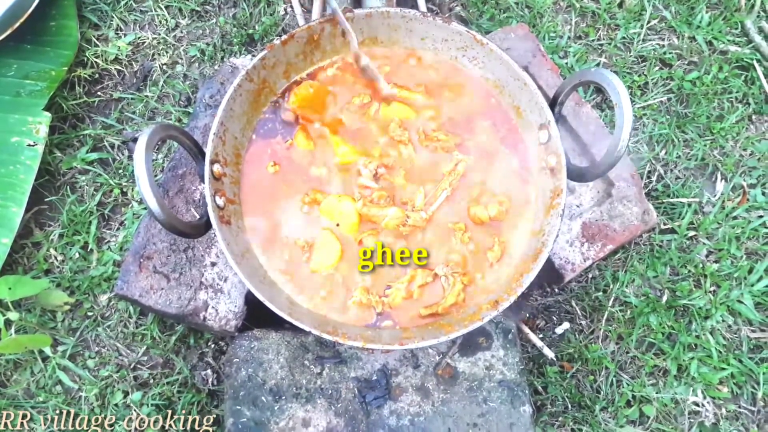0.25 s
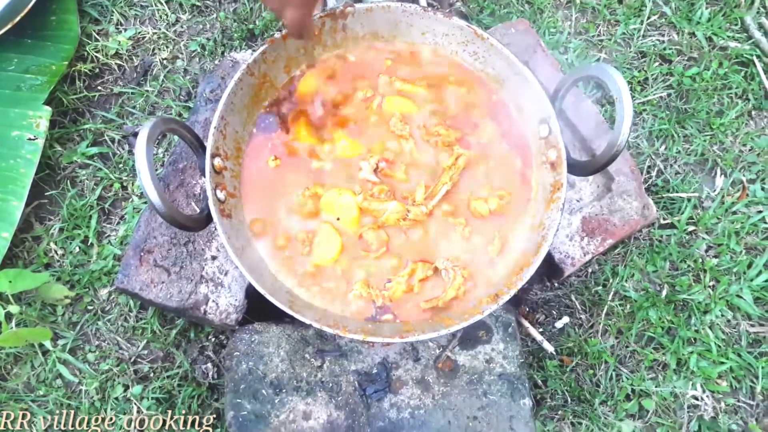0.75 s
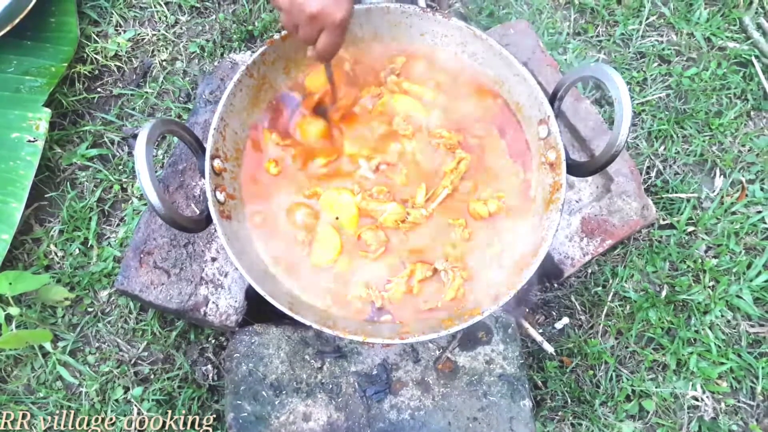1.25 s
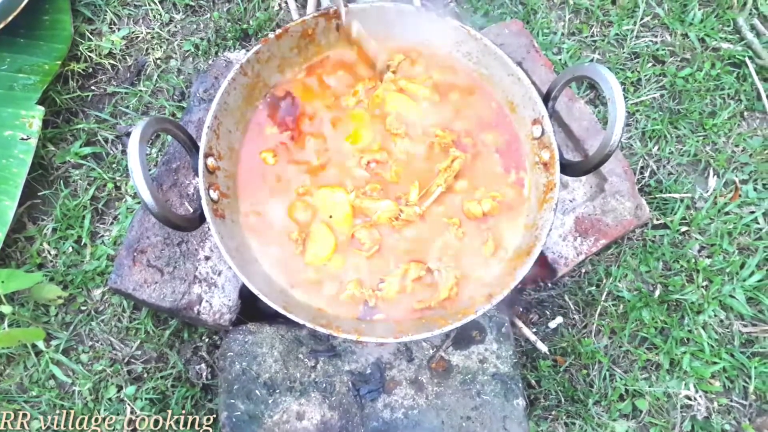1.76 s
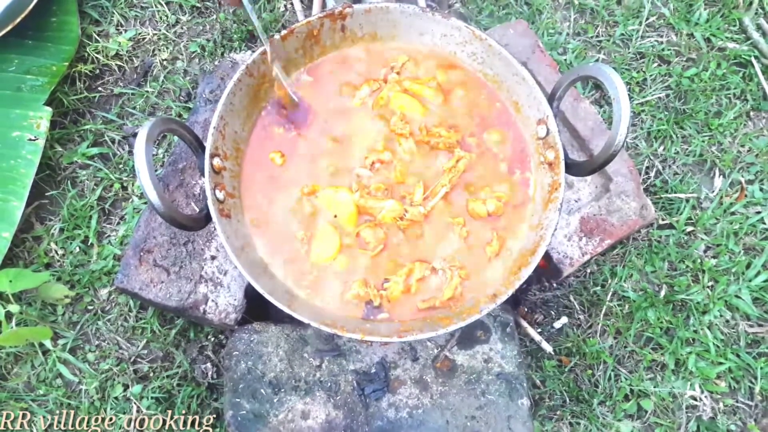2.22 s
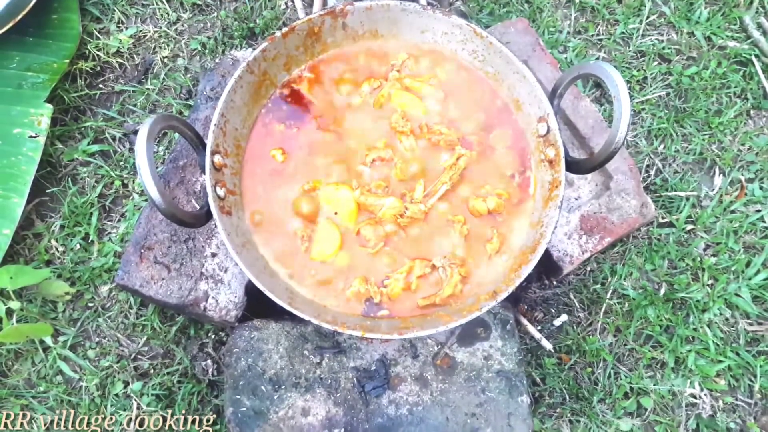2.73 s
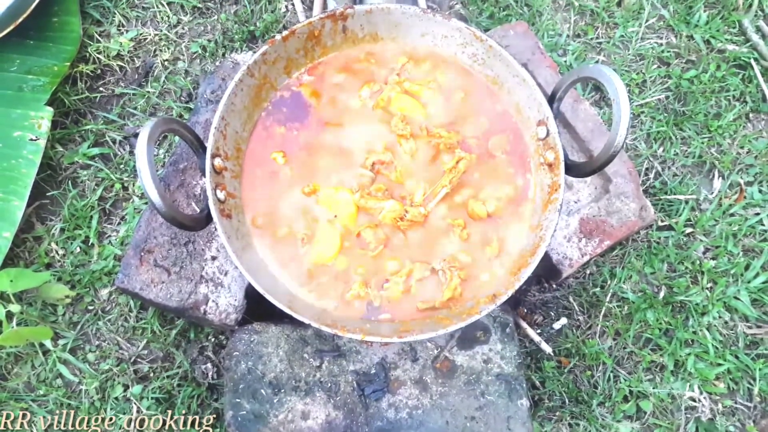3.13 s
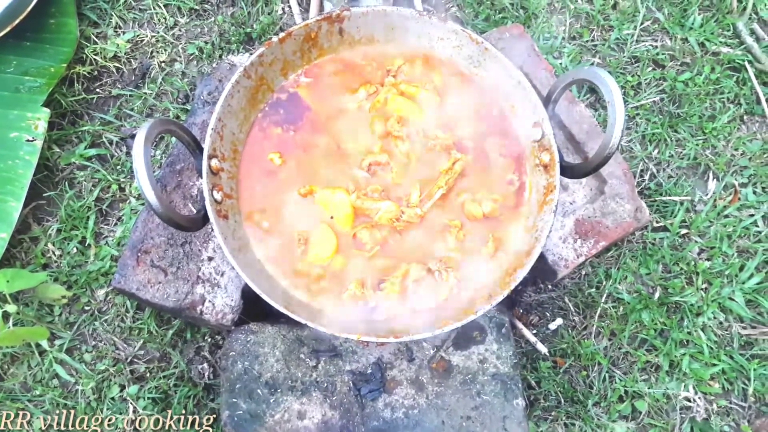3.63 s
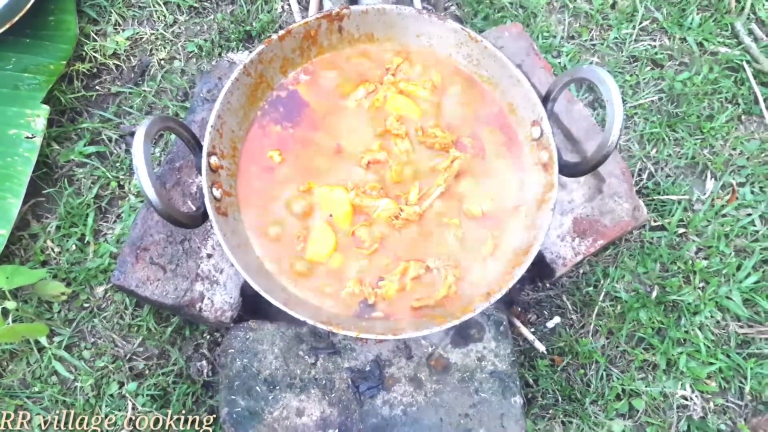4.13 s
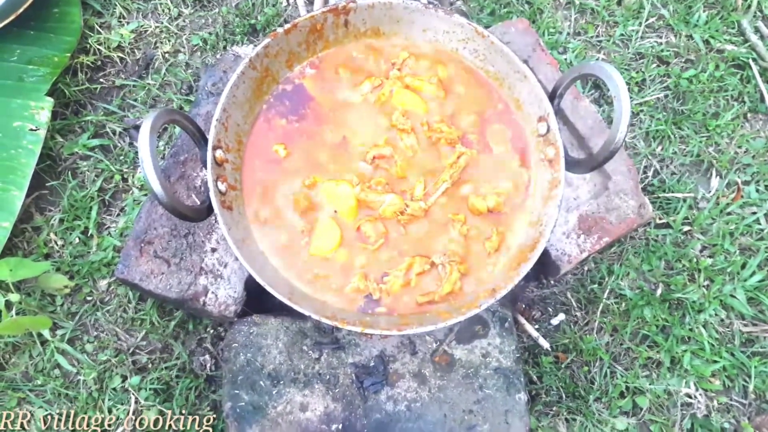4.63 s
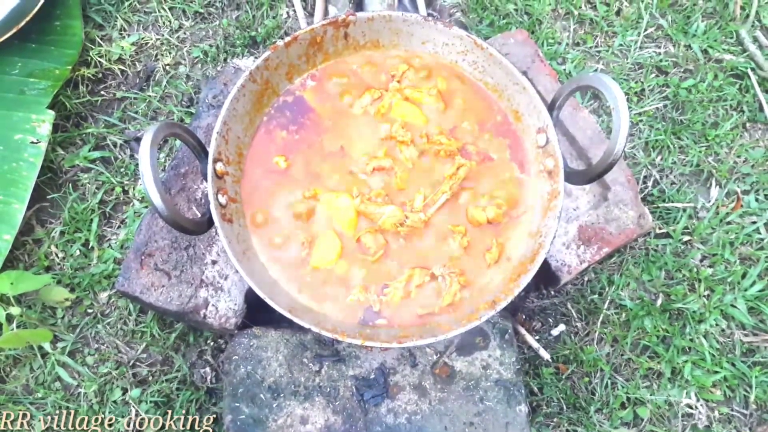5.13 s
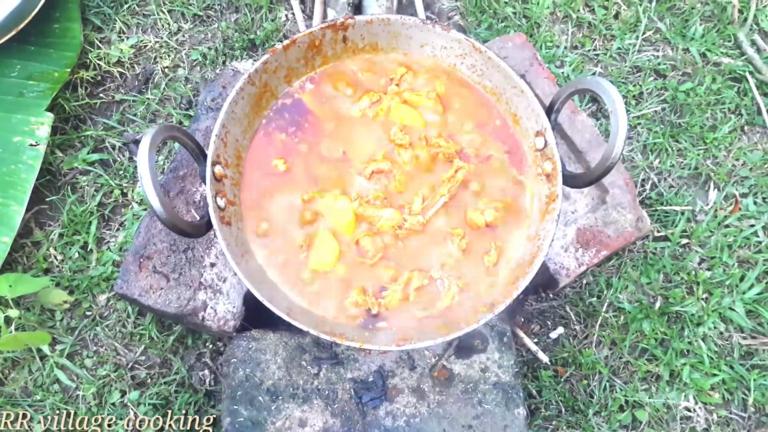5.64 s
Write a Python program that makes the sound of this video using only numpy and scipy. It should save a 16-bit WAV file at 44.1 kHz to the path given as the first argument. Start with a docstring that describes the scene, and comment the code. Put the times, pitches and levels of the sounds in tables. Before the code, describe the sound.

Thick curry bubbles and spits steadily in a metal pan over an outdoor fire, with sharp spoon knocks, insects and brief bird notes.

```python
"""In a garden, an open fire under a metal pan of thick simmering curry, heard by one microphone in open air.
Bubbles are damped tones of climbing pitch, spits filtered clicks, fire and steam coloured noise.
Insects (noise resonances and a pulse stack), a far engine and near and far birds surround the pan.
A spoon knocks on the pan's ringing modes, then jingles and squeals as it is laid down.
Gain control sinks around the loud knocks and slides back; a limiter holds their peaks."""
import sys
import numpy as np
from scipy import signal
from scipy.fft import rfft, irfft
from scipy.io import wavfile
from scipy.ndimage import uniform_filter1d, minimum_filter1d

SR = 44100
rng = np.random.default_rng(int(sys.argv[2]) if len(sys.argv) > 2 else 0)


def gain_from_db(level_db):
    """Convert decibel levels to linear amplitude factors (20 dB per decade)."""
    decades = np.asarray(level_db, float) / 20
    return 10 ** decades


def put_to_file(sound):
    """Save the sound as 16-bit audio at rate SR, in the file named by the first command-line argument."""
    columns = np.atleast_2d(sound).T  # one column per channel
    safe = np.clip(columns, -1, 1)
    whole_steps = np.round(safe * 32767)
    wavfile.write(sys.argv[1], SR, whole_steps.astype(np.int16))


N = 258891

# fire and steam wash, relative spectrum: [f/Hz, density/dB per Hz]
WASH_SPECTRUM = [(20, -33.5), (35, -22.5), (60, -6), (137, -0.5), (200, -3), (354, -15), (607, -10),
                 (900, -21), (1650, -20.5), (2700, -20), (3920, -20.5), (6560, -30), (8830, -17),
                 (11000, -17), (12500, -43), (15000, -42)]
# level of the steam wash over time, followed in part by the small bubbles: [t/s, level/dB]
STEAM_LEVEL = [(0, 1.5), (1, 1.5), (2, 1), (2.6, 1.5), (3.0, -4), (3.75, -5.5), (4.05, -2), (5, -1.5),
               (5.87, -1)]
# insect chorus resonances: [f/Hz, width before blurring/Hz, relative level/dB]
INSECT_CHORUS = [(5700, 202, -14.5), (7670, 180, -10), (8080, 33, -9.5), (8620, 89, -1.5), (9090, 49, -3),
                 (9400, 88, -6), (9980, 44, -7), (10760, 190, -7)]
# nearer insect: [multiple of pulse rate, level/dB]
CICADA = [(24, -62.5), (25, -66.5), (26, -66.5), (27, -60), (28, -62.5), (30, -63), (31, -62)]
# far engine: [multiple of firing rate, level/dB]
ENGINE = [(2, -77), (3, -68), (4, -57.5), (5, -52.5), (6, -61.5), (10, -72.5)]
# far engine: [t/s, firing rate/Hz]
ENGINE_SPEED = [(0, 30), (.7, 31), (2.5, 31.3), (4.2, 31), (5.87, 30.4)]
# loudest bubbles bursting: [t/s, level/dB, starting f/Hz, length/cycles]
BUBBLES = [(0.0308, -24, 3840, 7.8), (0.0371, -28, 4070, 9), (0.1003, -25.5, 4500, 9),
           (0.129, -32, 1310, 4), (0.2188, -32, 1360, 8.4), (0.2228, -21.5, 3630, 8.6),
           (0.2965, -28.5, 1600, 6.2), (0.3129, -22.5, 736, 3.7), (0.3756, -28.5, 4260, 9.8),
           (0.595, -24, 3710, 8), (0.6425, -30.5, 570, 3.8), (0.7672, -25, 3670, 7.2),
           (0.8206, -27, 570, 3.2), (0.847, -26, 3840, 9), (0.8546, -31, 1290, 7.0),
           (0.8796, -29.5, 1070, 11), (0.9954, -31.5, 670, 4.9), (1.041, -23.5, 3720, 9.6),
           (1.0911, -25, 3970, 9), (1.1389, -28, 624, 7.6), (1.1414, -24, 4610, 8.3),
           (1.1704, -24, 5760, 9), (1.312, -28.5, 3370, 9), (1.3421, -35, 2030, 13), (1.49, -34, 1920, 7),
           (1.7058, -34, 2310, 16), (1.5142, -21, 5640, 9), (1.5414, -24, 3360, 7.6),
           (1.6766, -27, 4060, 9), (1.7226, -20, 3750, 6.3), (1.79, -25.5, 930, 5.6),
           (1.7912, -26, 1850, 6), (1.7986, -23, 1220, 9.6), (1.815, -31, 1540, 8), (1.861, -25, 4400, 9),
           (2.0101, -26.5, 3500, 10), (2.0109, -32, 685, 3.5), (2.1879, -23, 1010, 6),
           (2.199, -27, 1900, 9), (2.232, -26, 565, 4.6), (2.2672, -24.5, 4120, 8), (2.3018, -27, 3610, 9),
           (2.8322, -30.5, 663, 5.5), (2.9645, -34, 1840, 34), (3.0608, -31.5, 630, 4.4),
           (3.1571, -32, 865, 7.7), (3.2075, -23, 4550, 9), (3.292, -24.5, 2390, 9.9),
           (3.3033, -17, 3990, 7.3), (3.3291, -34.5, 1500, 16), (3.4304, -24, 1215, 2.3),
           (3.662, -35.5, 1280, 19), (3.6828, -31, 1000, 4.9), (3.6858, -32, 2360, 11),
           (3.755, -32, 3540, 12), (4.012, -32, 1870, 6.5), (4.2962, -33, 945, 12), (4.2975, -34, 1900, 11),
           (4.3288, -30.5, 4000, 8.4), (4.481, -36, 960, 11.5), (4.9593, -28, 4210, 9),
           (5.0743, -35, 914, 14), (5.327, -34, 530, 8.4), (5.4196, -23.5, 610, 5.9), (5.56, -32, 716, 4.7),
           (5.8154, -26, 580, 2.7)]
# loudest droplets spitting on hot metal: [t/s, click level before the band filter/dB]
SPITS = [(0.0272, -24), (0.203, -24), (1.2963, -27), (1.6986, -24), (2.2052, -19), (3.3062, -23),
         (4.538, -24), (4.551, -25), (5.143, -10), (5.3078, -16), (5.4401, -24), (5.4904, -20),
         (5.6762, -23)]
# near bird notes: [t/s, length/s, first f/Hz, last f/Hz, level before throb/dB, throb depth 0-1]
NEAR_BIRD = [(1.811, 0.053, 2590, 2444, -42.5, 0.97), (1.966, 0.018, 2470, 2390, -39, 1),
             (2.092, 0.052, 2600, 2316, -34, .2), (2.14, .035, 2280, 2140, -43, 0.23),
             (2.142, .102, 2487, 2222, -39.5, 0.2), (2.287, 0.032, 1916, 2000, -42.5, 0.15),
             (2.314, 0.033, 1850, 1780, -44, 0)]
# far crow: [t/s, length/s, first fundamental f/Hz, last fundamental f/Hz, level/dB, tilt/dB per partial]
FAR_BIRD = [(1.06, .165, 660, 665, -56.5, -12), (1.22, .065, 668, 682, -62, -12),
            (3.99, .32, 655, 652, -65.5, 0)]
# far crow's sounding partials: [multiple of the fundamental, relative level/dB]
FAR_PARTIALS = [(3, 1), (4, 0), (5, -14)]
# spoon on pan: [t/s, level/dB, crack t60/s, ring and scatter relative level/dB, bass cut f/Hz]
KNOCKS = [(1.3745, -16, 0.0061, -29, 250), (2.388, -11.5, 0.0085, -39, 3000), (2.4247, 6, 0.02, -32.5, 70),
          (2.438, -30, 0.034, -27, 2000), (2.5858, 7, 0.022, -32, 130), (4.992, -19, 0.0054, -29, 410)]
# pan modes: [f/Hz, relative level before uneven striking/dB, t60/s]
PAN_MODES = [(137, 12, 0.013), (1458, -10.5, 0.092), (1926, -6.5, 0.092), (2560, -11, 0.098),
             (3000, -8.5, 0.12), (3740, 2.5, .06), (4160, -12, 0.17), (5740, -16, 0.11), (7300, -1, 0.097),
             (11300, -17, .06)]
# knock's crack, relative spectrum: [f/Hz, density/dB per Hz]
CRACK_SPECTRUM = [(60, -36), (130, -19), (400, -18.5), (2370, -18), (3320, -13), (4470, 0), (5530, -3.5),
                  (7450, -12), (8280, -17), (8830, -12), (11200, -6.5), (12700, -30.5), (14700, -19),
                  (16500, -9)]
# spoon modes: [f/Hz, width/Hz, relative rattle level/dB, relative squeal level/dB]
SPOON_MODES = [(1820, 120, -8.5, -19.5), (3750, 100, -11, -39), (4333, 34, -10, 1.5), (5040, 90, -16, -17),
               (6240, 130, -7, -31), (7620, 65, -25, -0.5), (8300, 54, -25, -7.5), (8700, 150, -1.5, -25),
               (9640, 180, -10, -30), (10470, 78, -6, -35), (11150, 81, -8, -31), (11400, 78, -6.5, -30),
               (14400, 80, -17, -20), (15300, 80, -21, -30)]
# touches of the spoon laid down, each a dying rattle: [t/s, level/dB, t60/s]
TOUCHES = [(4.768, -26.5, 0.077), (4.785, -39, 0.34), (4.839, -39, 0.21), (4.858, -43.5, 0.23),
           (4.885, -43, 0.084)]
# spoon slides: [t/s, length/s, first level/dB, last level/dB, extra level of upper modes/dB]
SLIDES = [(4.839, .028, -31, -23, -8), (4.868, .013, -25, -30, 6), (4.893, .03, -46, -47, 9)]


def rms_one(x):
    """Scale to unit rms."""
    return x / np.sqrt(np.mean(x ** 2) + 1e-20)


def in_time(rows):
    """Columns of a timed curve, interpolated sample by sample."""
    s, *columns = np.transpose(rows)
    return [np.interp(np.arange(N) / SR, s, column) for column in columns]


def drift(rate_hz):
    """Random wander of unit rms: noise through two equal low-pass poles at rate_hz."""
    r = np.exp(-80 * np.pi * rate_hz / SR)   # computed on every 40th sample
    noise = rng.standard_normal(N // 40 + 2002)
    slow = signal.lfilter([1], [1, -2 * r, r * r], noise)[2000:]
    return np.interp(np.arange(N) / 40, np.arange(len(slow)), rms_one(slow))


def resonance(x, hz, width_hz):
    """Two-pole peak with gain 1 on top."""
    r = np.exp(-np.pi * width_hz / SR)
    feedback = [1, -2 * r * np.cos(2 * np.pi * hz / SR), r * r]
    return signal.lfilter([(1 - r * r) / 2, 0, (r * r - 1) / 2], feedback, x + 1e-18)


def shaped(x, spectrum):
    """Causal colouring by a short minimum-phase filter, built through the cepstrum."""
    table_hz, table_db = np.transpose(spectrum)
    hz = np.maximum(np.fft.rfftfreq(4096, 1 / SR), 10)
    log_gain = np.interp(np.log(hz), np.log(table_hz), table_db) * np.log(10) / 20
    cepstrum = irfft(np.maximum(log_gain, -9))
    # fold onto positive time
    cepstrum[1:2048] *= 2
    cepstrum[2049:] = 0
    impulse = irfft(np.exp(rfft(cepstrum)))
    return signal.fftconvolve(x, impulse)[:len(x)]


def add(out, s, sound):
    """Lay a short sound in at time s."""
    i = int(s * SR)
    out[i:i + len(sound)] += sound[:N - i]


def stack(hz, partials, waver, flicker_db, rate_hz):
    """Multiples of one slightly unsteady repeat rate, each flickering on its own."""
    phase = 2 * np.pi * np.cumsum(hz * (1 + waver * drift(rate_hz))) / SR
    return sum(gain_from_db(db + flicker_db * drift(rate_hz)) * np.sin(k * phase + k * k) for k, db in partials)


def fire():
    """Low flame rumble; above it a steam wash that follows a level curve."""
    noise = rms_one(shaped(rng.standard_normal(N), WASH_SPECTRUM))
    wash = gain_from_db(-51.5 + 0.5 * drift(2.3)) * noise
    rumble = signal.lfilter(*signal.butter(1, 250, fs=SR), wash)
    steam = wash - rumble
    return rumble + gain_from_db(in_time(STEAM_LEVEL)[0]) * steam


def insects():
    """A far chorus blurs into noise in a few resonances; one nearer singer keeps its steady pulse rate."""
    white = rng.standard_normal((2, N))
    chorus = 0
    for k, (hz, width_hz, db) in enumerate(INSECT_CHORUS):
        band = resonance(white[k % 2], hz, width_hz + 500)   # blur by two passes, widened
        band = resonance(band, hz, width_hz + 500)
        chorus = chorus + gain_from_db(db + drift(30)) * band
    cicada = stack(345.1, CICADA, waver=0.00145, flicker_db=4.0, rate_hz=13.0)
    return gain_from_db(-45) * rms_one(chorus) + cicada


def engine():
    """A far drone: multiples of a firing rate that shifts slowly."""
    return stack(in_time(ENGINE_SPEED)[0], ENGINE, waver=0.002, flicker_db=1.5, rate_hz=5.0)


def bubble(hz, cycles, rise):
    """A bursting bubble: a damped tone whose pitch climbs as the cavity shrinks."""
    turns = np.arange(int(cycles / hz * SR) + 2) * hz / SR
    swell = 1 - np.exp(-turns / 0.45)
    decay = gain_from_db(-36 * turns / cycles)
    # squared term in the phase: the pitch ends higher by twice the rise
    return swell * decay * np.sin(2 * np.pi * turns * (1 + rise * turns / cycles))


def crowd(per_s, low_hz, high_hz, cycles, db, spread_db):
    """Bubbles at random times, with pitches spread evenly in log frequency."""
    out, draws = np.zeros(N), rng.random((3000, 4))
    times = np.cumsum(-np.log(1 - draws[:, 0])) / per_s
    for s, (_, pitch, size, length) in zip(times[times < N / SR], draws):
        hz = low_hz * (high_hz / low_hz) ** pitch
        level_db = db - spread_db * np.log(1 - 0.97 * size)
        add(out, s, gain_from_db(level_db) * bubble(hz, cycles * (0.5 + length), rise=0.18))
    return out


def simmer():
    """Listed bursts over crowds of small bubbles, which follow part of the steam's level curve."""
    small = crowd(120, 416, 1053, 6.1, -46.5, 3.77)
    small += crowd(70, 1120, 2590, 9.0, -48.0, 3.73)
    small += crowd(200, 3110, 6090, 21.4, -43, 1.1)
    small += crowd(8.1, 3170, 5400, 9.5, -32.0, 1.2)
    out = small * gain_from_db(0.58 * in_time(STEAM_LEVEL)[0])
    for s, db, hz, cycles in BUBBLES:
        add(out, s, gain_from_db(db) * bubble(hz, cycles, rise=0.03))
    return out


def spits():
    """Each droplet is a click of well under a millisecond: one impulse through a treble band filter."""
    happens = rng.random(N) < 120 / SR   # about 120 small spits a second
    clicks = happens * gain_from_db(-39.5 + 3.3 * np.minimum(rng.exponential(1, N), 3))
    for s, db in SPITS:
        clicks[int(s * SR)] += gain_from_db(db)
    return signal.sosfilt(signal.butter(2, [9000, 15800], "band", fs=SR, output="sos"), clicks)


def note(s, long_s, first_hz, last_hz, attack_s, release_s):
    """Envelope (attack, hold, release) and straight pitch glide of one note."""
    t = np.arange(N) / SR - s
    gate = np.clip(np.minimum(t / attack_s, (long_s - t) / release_s), 0, 1)
    return gate, np.interp(t, [0, long_s], [first_hz, last_hz])


def gate_arch(s, long_s):
    """Half a sine over one note."""
    return np.sin(np.pi * np.clip((np.arange(N) / SR - s) / long_s, 0, 1))


def near_bird():
    """A gliding whistle chopped by fast uneven throbs; throbbing notes also scatter in pitch."""
    out = np.zeros(N)
    throb = np.cos(np.pi * np.cumsum(217 * (1 + 0.25 * drift(59.7))) / SR) ** 4   # bursts near 217 Hz
    flutter_db, wobble, hoarse = 2.2 * drift(84), 0.015 * drift(61), 0.0416 * drift(253)
    for s, long_s, first_hz, last_hz, db, depth in NEAR_BIRD:
        gate, hz = note(s, long_s, first_hz, last_hz, attack_s=0.0064, release_s=0.0072)
        level = gate * gain_from_db(db + flutter_db) * (1 - depth + 2 * depth * throb)
        pitch_hz = hz * (1 + wobble + depth ** 2 * hoarse)
        out += level * np.sin(2 * np.pi * np.cumsum(pitch_hz) / SR)
    return out


def far_bird():
    """A thin far crow: a few upper partials on a pitch that arches and wavers."""
    out = np.zeros(N)
    for s, long_s, first_hz, last_hz, db, tilt_db in FAR_BIRD:
        gate, hz = note(s, long_s, first_hz, last_hz, attack_s=0.03, release_s=0.02)
        bend = 1 + 0.03 * gate_arch(s, long_s) + 0.004 * drift(9.6)
        phase = 2 * np.pi * np.cumsum(hz * bend) / SR
        for i, (k, partial_db) in enumerate(FAR_PARTIALS):
            level_db = db + partial_db + i * tilt_db + 1.5 * drift(28)
            out += gate * gain_from_db(level_db) * np.sin(k * phase)
    return out


def birds():
    """Near and far calls, both scattered a little by leaves: a decaying noise echo."""
    calls = near_bird() + far_bird()
    t = np.arange(int(0.12 * SR)) / SR
    leaves = rng.standard_normal(len(t)) * gain_from_db(-34.0 - 60 * t / 0.28)
    return calls + signal.fftconvolve(calls, leaves)[:N]


def knocks():
    """A sharp click, a noisy crack of some ms, pan modes damped by the curry, and a short scatter."""
    out, t = np.zeros(N), np.arange(int(0.3 * SR)) / SR
    for s, db, crack_s, ring_db, cut_hz in KNOCKS:
        scatter = gain_from_db(ring_db + 4 - 60 * t / 0.18)
        force = rng.standard_normal(len(t)) * (gain_from_db(-60 * t / crack_s) + scatter)
        force[0] = 2.9   # first contact
        crack = shaped(force, CRACK_SPECTRUM)
        crack = crack / np.sqrt(np.max(uniform_filter1d(crack ** 2, size=40)) * 3)
        ring = 0
        for hz, mode_db, t60 in PAN_MODES:
            uneven, apart = rng.uniform(-0.78, 1, 2)   # each mode is a close pair, struck unevenly
            pair = np.sin(2 * np.pi * hz * t) + 1.25 * np.sin(2 * np.pi * hz * (1 + 0.07 * apart) * t)
            ring = ring + gain_from_db(mode_db + 2 * uneven - 60 * t / t60) * pair
        bass_cut = signal.butter(2, cut_hz, "high", fs=SR)
        add(out, s, gain_from_db(db) * signal.lfilter(*bass_cut, crack + gain_from_db(ring_db) * ring))
    return out


def jingle():
    """Dense uneven contacts rattle the spoon; sliding keeps its thin modes singing."""
    t = np.arange(N) / SR
    shaken = low_rub = high_rub = 0
    for s, db, t60 in TOUCHES:
        decay = gain_from_db(db - 60 * np.maximum(t - s, 0) / t60)
        shaken = shaken + np.clip((t - s) / 0.0015, 0, 1) * decay   # attack in s
    for s, long_s, first_db, last_db, upper_db in SLIDES:
        slide_db = np.interp(t, [s, s + long_s], [first_db, last_db])
        release_db = -60 * np.maximum(t - s - long_s, 0) / 0.026   # t60 in s
        rub = np.clip((t - s) / 0.0018, 0, 1) * gain_from_db(slide_db + release_db)
        low_rub = np.maximum(low_rub, rub)
        high_rub = np.maximum(high_rub, rub * gain_from_db(upper_db))
    contacts = rng.standard_normal((2, N)) * gain_from_db(2.5 * drift(120))
    out = 0
    for k, (hz, width_hz, struck_db, rubbed_db) in enumerate(SPOON_MODES):
        rattle = rms_one(resonance(contacts[k % 2], hz, 1.5 * width_hz))   # broader than the squeal
        tone = np.sin(2 * np.pi * np.cumsum(hz * (1 + 0.003 * drift(39.4))) / SR)
        squeal = tone + 0.36 * rms_one(resonance(contacts[0], hz, width_hz))
        rub = low_rub if hz < 6000 else high_rub
        out = out + shaken * gain_from_db(struck_db) * rattle + rub * gain_from_db(rubbed_db + drift(36)) * squeal
    return out


def scene():
    """All sources reach one microphone in the open air."""
    around = fire() + insects() + engine() + birds()
    pan = simmer() + spits() + knocks() + jingle()
    return (around + pan)[None]


def gain_control(x):
    """A peak over the threshold slides the gain down; it holds, then slides back up."""
    threshold_db, depth_db, hold_s = -6.5, 10.5, 0.93
    down_db_s, up_db_s = 25, 14.5
    step = 64   # samples
    peaks = np.abs(np.pad(x, (0, -N % step))).reshape(-1, step).max(axis=1)
    cut_db, left_s, cuts_db = 0., 0., []
    for peak in peaks:
        left_s = hold_s if peak > gain_from_db(threshold_db) else left_s - step / SR
        if left_s > 0:
            cut_db = min(cut_db + down_db_s * step / SR, depth_db)
        else:
            cut_db = max(cut_db - up_db_s * step / SR, 0)
        cuts_db.append(cut_db)
    return x * gain_from_db(-uniform_filter1d(np.repeat(cuts_db, step)[:N], size=6000))


def limiter(x):
    """Looks ahead: gain eases down some 17 ms before a peak over -1 dB and returns as long after it."""
    over_db = np.maximum(20 * np.log10(np.abs(x) + 1e-9) + 1, 0)
    return x * gain_from_db(uniform_filter1d(minimum_filter1d(-over_db, size=1100), size=400))


def band_limit(x):
    """A steep low-pass at the top of the band."""
    return signal.sosfilt(signal.butter(12, 16820, fs=SR, output="sos"), x)


def record(dry):
    """Microphone signal through gain control, limiter and a steep top cut."""
    level_held = limiter(gain_control(dry[0]))
    top_cut = signal.ellip(8, 0.5, 38, 15550, fs=SR, output="sos")
    mix = signal.sosfilt(top_cut, level_held)[None]
    return band_limit(mix)


dry = scene()
out = record(dry)
put_to_file(out)
```